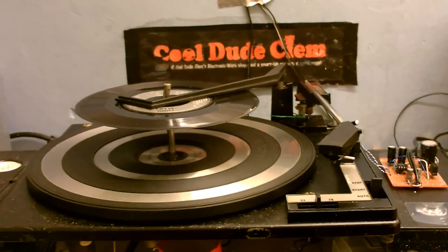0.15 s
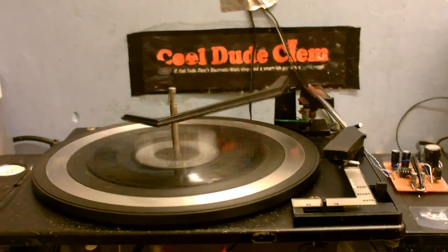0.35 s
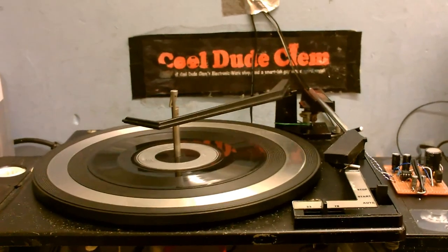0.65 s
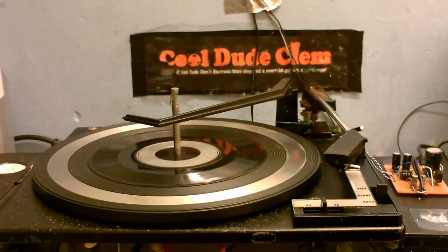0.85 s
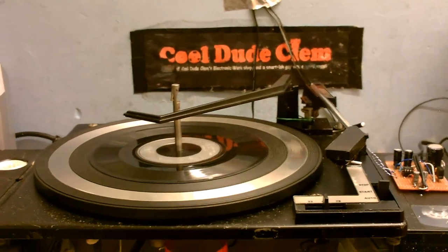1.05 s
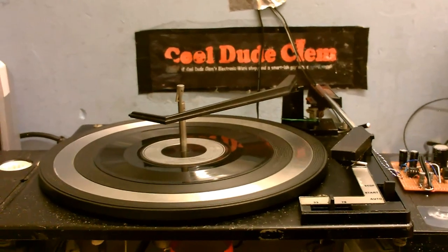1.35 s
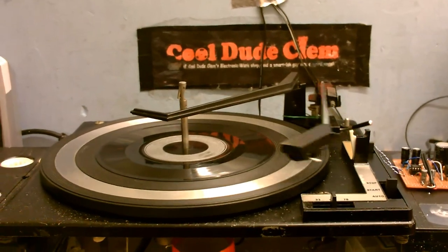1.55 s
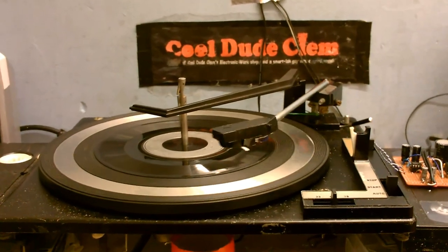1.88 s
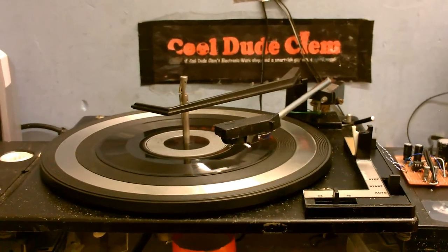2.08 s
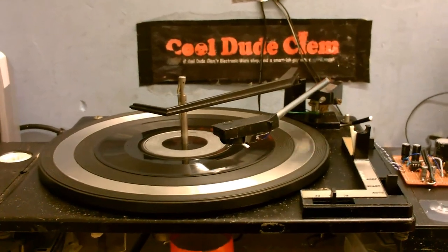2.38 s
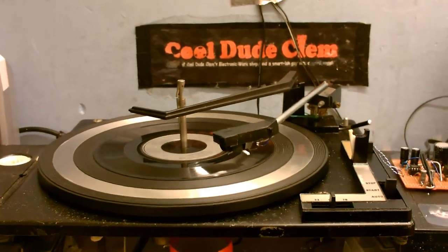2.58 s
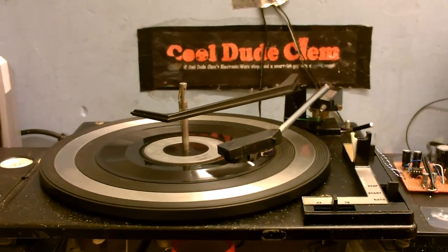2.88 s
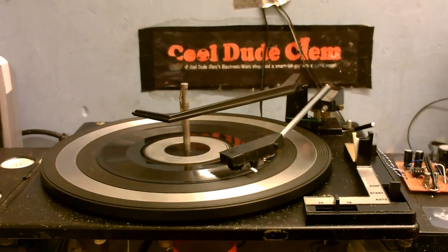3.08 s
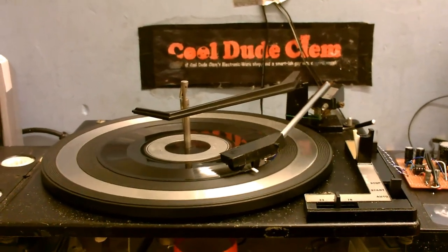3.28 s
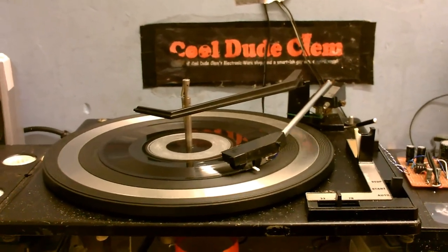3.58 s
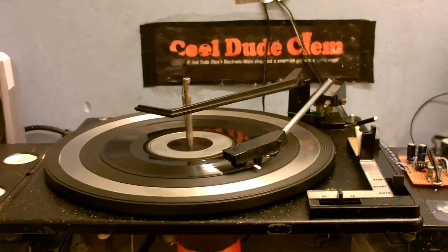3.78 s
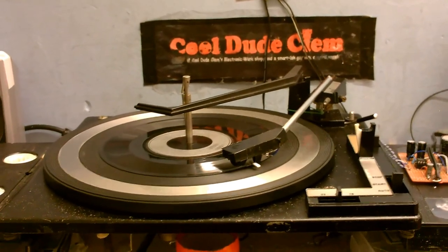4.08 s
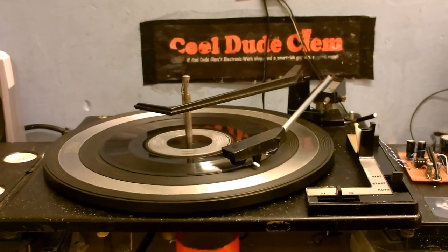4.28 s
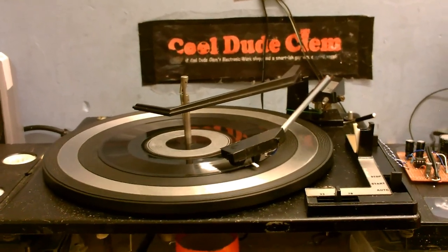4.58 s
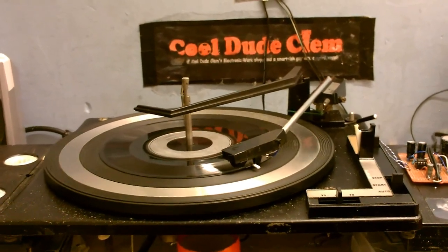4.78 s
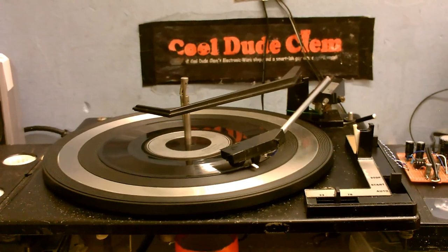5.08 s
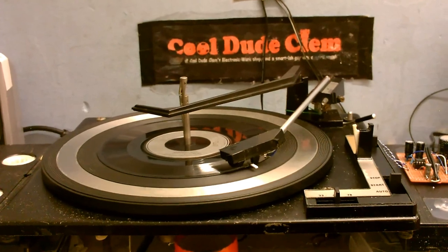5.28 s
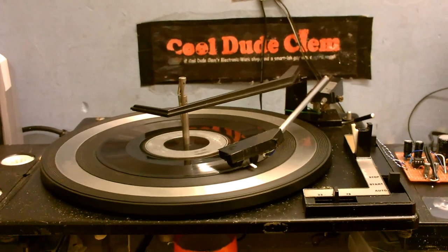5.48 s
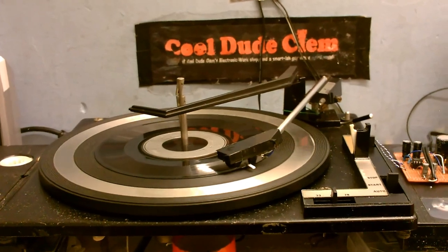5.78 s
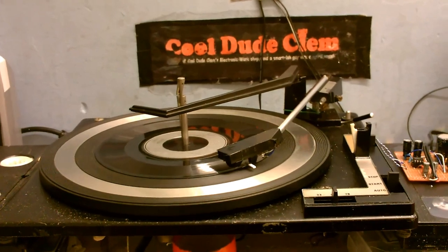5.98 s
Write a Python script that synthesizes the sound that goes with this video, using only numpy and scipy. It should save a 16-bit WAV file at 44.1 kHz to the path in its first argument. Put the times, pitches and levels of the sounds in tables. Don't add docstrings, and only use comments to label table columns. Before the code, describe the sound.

Over a faint motor hum, a record changer drops a disc with a burst of clacks, clicks its arm across, then the stylus crackles on a scuffed groove.

```python
import sys
import numpy as np
from scipy import signal
from scipy.fft import rfft, irfft
from scipy.io import wavfile
from scipy.ndimage import uniform_filter1d

SR = 44100
rng = np.random.default_rng(int(sys.argv[2]) if len(sys.argv) > 2 else 0)


def log_audio(samples):
    frames = np.atleast_2d(samples).T
    limited = np.clip(frames, -1, 1)
    pcm = np.round(limited * 32767).astype(np.int16)
    wavfile.write(sys.argv[1], SR, pcm)


def gain_from_db(level_db):
    decades = np.asarray(level_db, float) / 20
    return 10 ** decades


N = 270892


def rms_one(x):
    return x / np.sqrt(np.mean(x ** 2) + 1e-20)


def at_hz(points, hz):
    table_hz, values = np.transpose(points)
    return np.interp(np.log(hz), np.log(table_hz), values)


def band(x, low_hz, high_hz):
    return signal.sosfilt(signal.butter(2, [low_hz, high_hz], "band", fs=SR, output="sos"), x + 1e-18)


def resonate(x, hz, width):
    r = np.exp(-np.pi * width / SR)
    gain = (1 - r * r) / 2
    return signal.lfilter([gain, 0, -gain], [1, -2 * r * np.cos(2 * np.pi * hz / SR), r * r], x + 1e-18)


def body(x, peaks):
    return sum((-1) ** k * gain_from_db(db) * resonate(x, hz, width) for k, (hz, width, db) in enumerate(peaks))


def grains(per_s, spread_db):
    sizes = gain_from_db(spread_db * np.minimum(rng.exponential(1, N), 4)) * rng.choice([-1, 1], N)
    return rms_one(sizes * (rng.random(N) < per_s / SR))


def add(out, s, piece):
    i = round(s * SR)
    out[i:i + len(piece)] += piece[:max(N - i, 0)]


def chatter(t, length, count):
    spectrum = rfft(rng.standard_normal((count, len(t))) * np.exp(-t / length))
    return irfft(spectrum / np.abs(spectrum) ** .7, len(t)) * np.exp(-t / (4 * length))


# thud, body, clack, tick (frequency [Hz])
BAND_EDGES_HZ = [230, 700, 3000, 7000, 13600]
CLACK_FOLLOWS = 0.6
RISE_S = 0.0016


def blows(events, modes, ring_db, crack_db, rattle_s, clack_db, contact_s):
    out, t = np.zeros(N), np.arange(SR // 5) / SR
    rise = np.minimum(t / RISE_S + 0.079, 1)
    for s, db, thud, hard in events:
        contact = chatter(t, max(contact_s, 3e-4), count=4)
        colour = (thud, 0, clack_db + CLACK_FOLLOWS * hard, hard)
        crack = np.zeros(len(t))
        for c, low, high, level in zip(contact, BAND_EDGES_HZ, BAND_EDGES_HZ[1:], colour):
            part = band(band(c, low, high), low, high)
            crack += gain_from_db(level) * part / np.abs(part).max()
        rattle = chatter(t, rattle_s, count=1)[0]
        ring = np.zeros(len(t))
        for hz, width, level in modes:
            mode = resonate(resonate(rattle, hz, max(width, hz / 150)), hz, 4 * width)
            ring += gain_from_db(level) * mode / np.abs(mode).max()
        add(out, s, gain_from_db(db) * (gain_from_db(crack_db) * crack + gain_from_db(ring_db) * ring) * rise)
    return out


# (time [s], body peak [dB], thud [dB re body], hardness [dB re body])
RELEASE = [
    (.398, -24.5, -22, -28),
    (.408, -29, -1, -2),
    (.4145, -12.5, -10, -30),
    (.421, -26, -18, 6),
    (.429, -17.5, -5, -6),
]
SLIDE = [
    (.437, -13.5, -12, -5.5),
    (.443, -13, -11, -25),
    (.4485, -15, -16, 2),
    (.452, -17.5, -11, -3),
    (.460, -33, -17, -6),
]
LANDING = [
    (.476, -9.5, -15, -17),
    (.482, -18, -10, -14),
    (.4872, -7, -25, -1.5),
    (.492, -15.5, -24, -17),
    (.4965, -11.5, -27, -1.5),
    (.508, -21, -14, 3),
    (.53, -34, -19, -14),
]
# (frequency [Hz], width [Hz], level [dB])
RELEASE_MODES = [(445, 57, -16), (1140, 110, -3.5), (1930, 900, -16)]
SLIDE_MODES = [(1070, 540, 0), (2310, 720, -2), (5700, 210, -11), (7700, 550, -8), (9900, 420, -3),
               (10800, 270, -10)]
LANDING_MODES = [(282, 43, -12.5), (403, 100, -4), (993, 140, 0.5), (1240, 270, -26), (2390, 220, -1),
                 (3660, 600, -3)]


def disc_drop():
    release = blows(RELEASE, RELEASE_MODES, ring_db=-2.0, crack_db=-10.5, rattle_s=0.003,
                    clack_db=5.5, contact_s=0.0062)
    slide = blows(SLIDE, SLIDE_MODES, ring_db=-6, crack_db=1, rattle_s=0.0075,
                  clack_db=-2.0, contact_s=0.0042)
    landing = blows(LANDING, LANDING_MODES, ring_db=-12.5, crack_db=-7, rattle_s=0.0042,
                    clack_db=0.5, contact_s=0.0037)
    return release + slide + landing


# (time [s], body peak [dB], thud [dB re body], hardness [dB re body])
LATCH = [
    (.854, -14, -18.5, -8),
    (.864, -32, -3, 0),
    (.88, -34, -8, -24),
]
CAM = [
    (1.296, -23, -38, -22),
    (1.302, -35, -23, -29),
    (1.318, -44, -20, -28),
    (2.559, -28, -6.5, -11),
    (2.563, -29.5, -10, -15),
    (2.569, -26, -14, -23),
    (2.588, -38.5, -0.5, -30),
]
LEVER = [(1.536, -49, -11, -14), (1.828, -41, -24, -31), (1.826, -41.5, -11, -24), (1.993, -39, -10, -15),
         (2.012, -40.5, -31, -45), (2.04, -52, 3, -42), (2.185, -52, -16, -23), (2.211, -47.5, 5.5, -24),
         (2.221, -47, -2, -26), (2.802, -44, -5, -18), (2.832, -42.5, -16, -17), (2.881, -46.5, -3, -32),
         (3.066, -49, -12, -30), (3.128, -66, -9, -24)]
# (time [s], level [dB])
PAWL = [
    (0.05, -62),
    (0.751, -52),
    (1.015, -51),
    (1.084, -48),
    (1.152, -42.5),
    (1.221, -46),
    (2.391, -48),
    (2.456, -53),
]
# (frequency [Hz], width [Hz], level [dB])
LATCH_MODES = [(262, 47, -13), (470, 160, -5.5), (694, 62, -11.5), (1000, 250, 0.5), (1224, 190, -0.5),
               (1660, 140, -18), (2160, 140, -10), (3070, 580, -6.5), (4360, 430, -16)]
CAM_MODES = [(245, 41, -27), (1020, 110, -7), (1466, 96, -2), (1730, 140, 4.5), (2370, 380, -3),
             (2840, 1400, -9), (3830, 320, -12)]
LEVER_MODES = [(1040, 360, 1.5), (1440, 390, -0.5), (2490, 370, -16), (3630, 440, -9)]
PAWL_MODES = [(1020, 130, 0)]


def arm_swing():
    latch = blows(LATCH, LATCH_MODES, ring_db=-6.5, crack_db=-3.0, rattle_s=0.0094,
                  clack_db=1.0, contact_s=0.0049)
    cam = blows(CAM, CAM_MODES, ring_db=-9.5, crack_db=-3.0, rattle_s=0.0079,
                clack_db=0.5, contact_s=0.0045)
    lever = blows(LEVER, LEVER_MODES, ring_db=-9.0, crack_db=-2.5, rattle_s=0.025,
                  clack_db=4.0, contact_s=0.0096)
    ticks = [(s, db, -20, -30) for s, db in PAWL]
    pawl = blows(ticks, PAWL_MODES, ring_db=2.0, crack_db=-13, rattle_s=0.0012,
                 clack_db=-1.5, contact_s=0.0015)
    return latch + cam + lever + pawl


# (time [s], body peak [dB], thud [dB re body], hardness [dB re body])
CATCH = [
    (3.172, -34, -9, 5),
    (3.178, -56, -6, -3),
    (3.201, -54, -16, -14),
]
SPRING = [
    (3.422, -38, -14, -22),
    (3.4282, -22, -35, 8),
    (3.435, -35.5, 2.5, -10),
    (3.45, -48, -13, -18),
]
STOP = [
    (3.6115, -28.5, -11, 18),
    (3.614, -23, -18, -4),
    (3.621, -26, -21, -9),
    (3.634, -31, 2.5, -22),
]
# (frequency [Hz], width [Hz], level [dB])
CATCH_MODES = [(1720, 150, -3.5), (3300, 600, 1.5), (4770, 430, -5), (8360, 1200, 3.5), (11000, 710, -7.5)]
SPRING_MODES = [(620, 116, -9), (957, 46, -11.5), (2300, 780, -6), (4480, 860, 0), (6000, 690, -22),
                (8400, 49, -10), (10600, 1200, -15), (13100, 1200, -18), (15100, 900, -2)]
STOP_MODES = [(274, 27, -6), (466, 69, -0.5), (610, 200, 2), (910, 140, 0.5), (1490, 176, 4.5),
              (1670, 220, -1.5), (2070, 250, -25), (6300, 640, 0.5), (9700, 580, -2)]


def cycle_end():
    catch = blows(CATCH, CATCH_MODES, ring_db=-3.5, crack_db=-12.0, rattle_s=0.0069,
                  clack_db=4.0, contact_s=0.0036)
    spring = blows(SPRING, SPRING_MODES, ring_db=-3, crack_db=1.5, rattle_s=0.012,
                   clack_db=1.0, contact_s=0.0068)
    stop = blows(STOP, STOP_MODES, ring_db=-4, crack_db=-1, rattle_s=0.0084,
                 clack_db=0.5, contact_s=0.0032)
    return catch + spring + stop


TURN_S = 1.2935
# (frequency [Hz], width [Hz], level [dB])
PICKUP = [(336, 150, 0), (660, 93, -8), (1200, 390, 0), (1434, 120, 3), (2030, 376, -0.5), (3110, 400, -5),
          (4020, 580, -3.5), (4690, 840, -6), (5940, 2850, -14.5), (9600, 1500, 3.5), (13800, 2500, 1)]
# (time [s], peak [dB], thud [dB re peak], tick [dB re peak], change on the next turn [dB])
SCUFFS = [(3.7787, -38.5, -7, -21, 3), (3.828, -37, -5, -14, 4.5), (3.886, -29, 1.5, -14, -0.5),
          (3.9416, -22, -3, -40, 1), (3.9461, -28, -4, -29, 2), (4.0426, -31, 2, -23, -1),
          (4.0541, -28, -5, -30, 0), (4.067, -23.5, -4, -38, 1), (4.08, -23, -1, -38, -1),
          (4.0944, -39, -4, -30, 8), (4.1642, -28, 1.5, -17, 2.5), (4.1801, -29, -9, -20, 0),
          (4.2, -37, -17, -23, -9), (4.2369, -22.5, -15, -20, 1.5), (4.2471, -46, 0, -22, 7),
          (4.2675, -28, -17, -32, 0), (4.3152, -27, 2, -26, -3), (4.3223, -36, -19, -24, 0),
          (4.3446, -36, -3, -12, 3.5), (4.406, -27.5, 2, -18, 2.5), (4.484, -35, -13, -25, -3),
          (4.7357, -40, 5, -2, 3.5), (4.7569, -28, -3.5, -17, 2.5), (4.9309, -30.5, -3, -14, 0.1)]
# (time [s], level [dB], change on the next turn [dB])
SPECKS = [
    (3.3014, -39.5, -14),
    (3.343, -43, -1),
    (3.6127, -56, 9),
    (3.755, -52, 0.5),
    (3.854, -43, 8),
    (4.225, -45, -10.5),
    (4.278, -31.5, 5.5),
]
SCUFF_BODY_DB, BODY_FOLLOWS = -45, 0.8


def scuffs():
    thuds, middles, clacks, ticks = pops = np.zeros((4, N))
    specks = [(s, db, -15, -20, again) for s, db, again in SPECKS]
    for s, db, low, tick, again in SCUFFS + specks:
        jolt = .07 * rng.standard_normal(900) * np.exp(-np.arange(900) / SR / .004)
        jolt[[0, 14, 31, 59]] = np.array([1, .25, .2, .15]) * np.r_[1, rng.standard_normal(3)]
        mid = SCUFF_BODY_DB + BODY_FOLLOWS * (db + 28)
        for at, more_db in ((s, 0), (s + TURN_S, again)):
            for row, level in zip(pops, (db + low, mid, db, db + tick)):
                add(row, at, gain_from_db(level + more_db) * jolt)
    knock = gain_from_db(27.5) * resonate(band(thuds, 184, 550), *PICKUP[0][:2])
    middle = gain_from_db(30) * body(band(middles, 730, 6300), PICKUP[1:5])
    clack = gain_from_db(23.0) * body(band(clacks, 2500, 5700), PICKUP[5:9])
    return knock + middle + clack + gain_from_db(16.0) * band(ticks, 6300, 12000)


STYLUS_DOWN_S = 3.3
# (time [s], level [dB re smooth groove])
WEAR = [(3.76, 1.5), (3.9, 2), (3.95, 6.5), (4.02, 4.5), (4.07, 11.5), (4.14, 5.5), (4.26, 9), (4.3, 4),
        (4.325, 9.5), (4.36, 0), (4.41, 6), (4.46, 0.5), (4.6, 0.4), (4.64, 0), (4.71, 0.5), (4.75, 2),
        (4.85, 0), (4.97, 2.5)]
WEAR_DEEPENS_PER_S = 0.3
# (middle time [s], half length [s], level [dB])
DUST = [
    (3.685, 0.033, 6),
    (4.40, 0.03, 4),
    (4.64, 0.043, 4.5),
]
RASP_DB, THUD_DB, FIZZ_DB = -58.5, -57, -70
RASP_FOLLOWS, THUD_FOLLOWS, FIZZ_FOLLOWS = 0.98, 1.15, 0.47
PRICKLE = 0.6


def groove():
    t = np.arange(N) / SR
    wear = np.interp(t, *np.transpose(WEAR), period=TURN_S)
    wear = wear * (1 + WEAR_DEEPENS_PER_S * (t - WEAR[0][0]))
    dust = np.zeros(N)
    for s, half, db in DUST:
        away = (t - s + TURN_S / 2) % TURN_S - TURN_S / 2
        dust += db * np.exp(-(away / half) ** 2)
    grit = grains(900, spread_db=3.0)
    prickle = band(grains(110, spread_db=3.0), 3300, 6500)
    rasp = rms_one(body(grit, PICKUP[1:9])) + PRICKLE * rms_one(body(prickle, PICKUP[6:9]))
    fizz = rms_one(body(grains(2500, spread_db=2.5), PICKUP[9:]))
    thud = rms_one(resonate(grit + grains(600, spread_db=5.0), *PICKUP[0][:2]))
    crackle = (gain_from_db(RASP_DB + RASP_FOLLOWS * wear) * rasp
               + gain_from_db(FIZZ_DB + FIZZ_FOLLOWS * wear + dust) * fizz
               + gain_from_db(THUD_DB + THUD_FOLLOWS * wear) * thud)
    return crackle * (t > STYLUS_DOWN_S)


# (time [s], level [dB], frequency [Hz])
THUMPS = [
    (3.301, -35, 290),
    (3.319, -39, 300),
    (3.343, -42, 330),
    (5.503, -35, 1000),
    (5.514, -34, 1080),
    (5.527, -34, 1150),
    (5.912, -35, 310),
]


def arm():
    out, t = np.zeros(N), np.arange(SR // 20) / SR
    for s, db, hz in THUMPS:
        add(out, s, -gain_from_db(db) * np.sin(2 * np.pi * hz * t) * np.exp(-t * hz / 3.3))
    return out


# (time [s], level [dB])
BACKGROUND = [(0.0, -61.5), (0.46, -61.5), (0.85, -64.5), (1.03, -63), (2.13, -62), (3.27, -59)]
# (frequency [Hz], level [dB])
RUMBLE = [(12, -53), (20, -9), (120, -6), (255, -1), (718, -9.5), (1060, -13.5), (1960, -17.5),
          (16000, -32)]
# (frequency [Hz], width [Hz], level [dB re rumble])
HUM = [(250.8, 19.4, -4), (446.4, 34, -12.5)]
# (frequency [Hz], level [dB re rumble])
WHINE = [(792, -13), (1586, -14.5)]
# (frequency [Hz], width [Hz], level [dB])
GEARS = [(1030, 200, 2.5), (1640, 290, -1), (2470, 560, -11.5)]
WHIRR_DB, WHIRR_FOLLOWS = -64, 0.68


def motor():
    t = np.arange(N) / SR
    background_db = np.interp(t, *np.transpose(BACKGROUND))
    hz = np.maximum(np.fft.rfftfreq(N, 1 / SR), 10)
    rumble = rms_one(irfft(rfft(rng.standard_normal(N)) * gain_from_db(at_hz(RUMBLE, hz)), N))
    hum = np.zeros(N)
    for f, width, db in HUM:
        hum += gain_from_db(db) * rms_one(resonate(resonate(rng.standard_normal(N), f, width), f, width))
    wander = np.cumsum(rng.standard_normal(N)) * 2.5e-5
    whine = sum(gain_from_db(db + 3.5) * np.sin(f * (2 * np.pi * t + wander * 0.037)) for f, db in WHINE)
    whirr = rms_one(body(grains(500, spread_db=3.0), GEARS))
    whirr_level = gain_from_db(WHIRR_DB + WHIRR_FOLLOWS * (background_db + 59))
    return gain_from_db(background_db + 5.5) * (rumble + hum + whine) + whirr_level * whirr


# (frequency [Hz], time [s])
ROOM_T60 = [(200, 0.2), (1000, 0.18), (3000, .21), (8000, 0.17), (15000, 0.12)]


def room(x):
    t, edges = np.arange(SR // 2) / SR, 120 * 2 ** np.arange(0, 7.1, .5)
    echo = np.zeros(len(t))
    for low, high in zip(edges, edges[1:]):
        noise = rms_one(band(rng.standard_normal(len(t)), low, high)) * np.sqrt(high - low)
        echo += noise * gain_from_db(-60 * t / at_hz(ROOM_T60, np.sqrt(low * high)))
    power = np.abs(rfft(echo)) ** 2
    even = np.sqrt(uniform_filter1d(power, size=601) / uniform_filter1d(power, size=31))
    echo = irfft(rfft(echo) * even, len(t)) * (t < .4)
    echo = echo * np.clip((t - .002) / 0.00047, 0, 1)
    return signal.fftconvolve(x, echo / np.sqrt(np.sum(echo ** 2)))[:N]


def scene():
    parts = disc_drop() + arm_swing() + cycle_end()
    needle = scuffs() + groove() + arm()
    echoes = room(gain_from_db(-4.5) * parts + gain_from_db(-5) * needle)
    return (parts + needle + echoes + motor())[None]


def top_cut(x):
    return signal.sosfilt(signal.butter(12, 16370, fs=SR, output="sos"), x)


def record(dry):
    x = signal.sosfilt(signal.butter(1, 25, "high", fs=SR, output="sos"), dry)
    x = .5 * np.tanh(x / .5)
    x = signal.sosfilt(signal.ellip(10, .5, 70, 15900, fs=SR, output="sos"), x)
    return top_cut(x)


dry = scene()
out = record(dry)
log_audio(out)
```